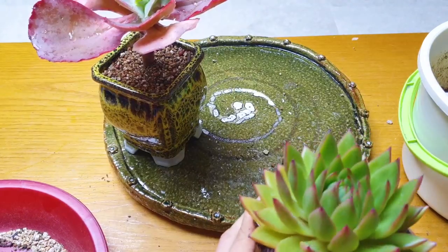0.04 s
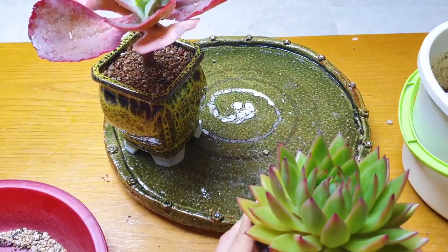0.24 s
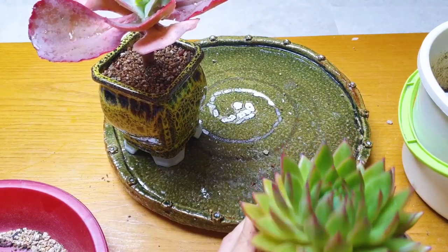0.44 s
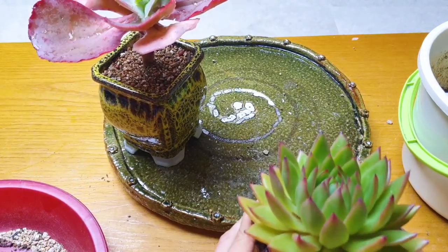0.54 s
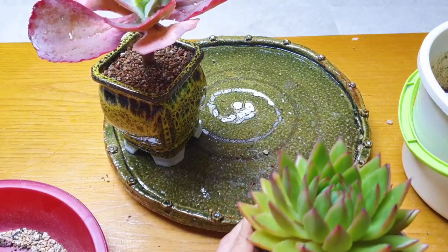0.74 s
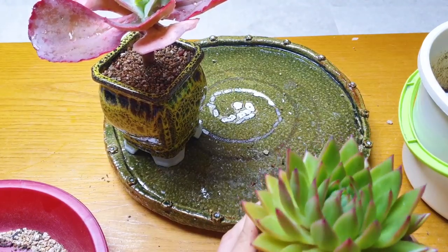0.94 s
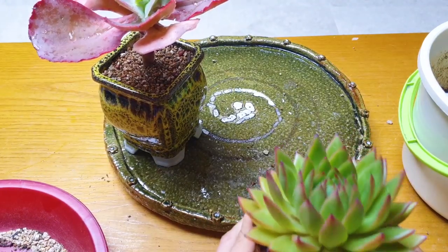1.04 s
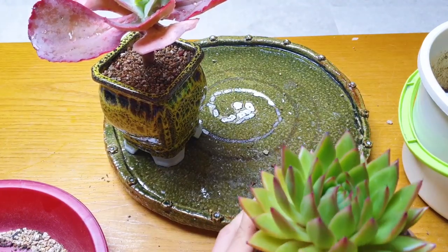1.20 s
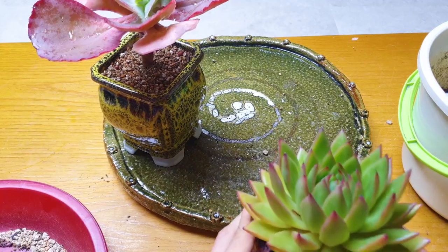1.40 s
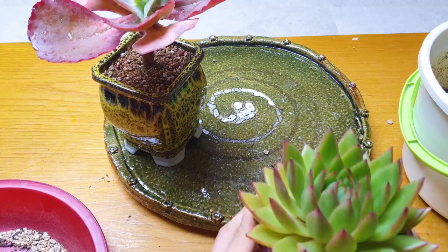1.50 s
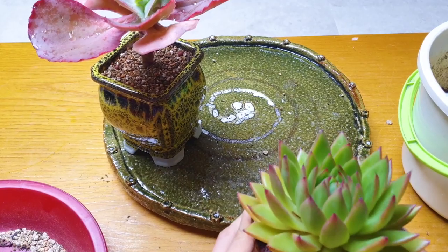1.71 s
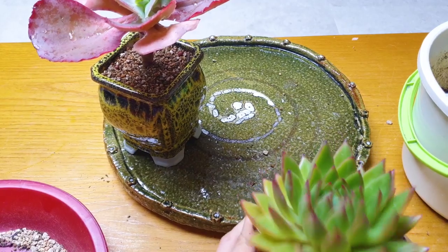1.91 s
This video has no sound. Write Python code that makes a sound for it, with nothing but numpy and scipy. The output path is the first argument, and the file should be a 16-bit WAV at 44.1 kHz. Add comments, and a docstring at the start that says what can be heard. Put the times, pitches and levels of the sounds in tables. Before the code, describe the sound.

A small soil-filled ceramic pot is knocked repeatedly on a wooden table, grit rattling inside

```python
"""Flowerpot knocked on a table

A small soil-filled ceramic pot is knocked down on a wooden table about three times a second, near a phone.
Each blow is a smooth push that thumps, and rings the damped modes of table top and pot.
Grit in the pot is random clicks that jump, tick on its wall and settle as a fading crackle.
Standing waves and banded, decaying noise make the small room; a faint steady hush lies beneath."""
import sys
import numpy as np
from scipy import signal
from scipy.fft import rfft, irfft
from scipy.io import wavfile

SR = 44100
rng = np.random.default_rng(int(sys.argv[2]) if len(sys.argv) > 2 else 0)


def to_wav(s):
    """Save 16-bit WAV."""
    ch = np.atleast_2d(s).T  # columns
    pcm = np.round(np.clip(ch, -1, 1) * 32767)  # PCM
    wavfile.write(sys.argv[1], SR, pcm.astype(np.int16))


def rack_gain(trim_db):
    """Turn a fader trim in dB into the linear factor to multiply a signal by."""
    fader = np.asarray(trim_db, float)
    return 10 ** (fader / 20)


N = 85995  # length in samples
OPPOSITE = np.array([[1], [-1]])  # puts a side signal into left and right with opposite signs


def shade(x, points):
    """Equaliser through (frequency [Hz], level [dB]) points joined on a log axis."""
    hz, db = np.array(points, float).T
    f = np.maximum(np.fft.rfftfreq(x.shape[-1], 1 / SR), 1)
    gain = rack_gain(np.interp(np.log(f), np.log(hz), db))
    return irfft(rfft(x) * gain, x.shape[-1])


def unit(x):
    """Scale to rms 1."""
    return x / np.sqrt(np.mean(x ** 2))


def ring(modes, t, shape):
    """Decaying sines weighted by mode shape; level and pitch differ a little each time."""
    scatter_db, jitter = 0.8, 0.006  # standard deviations; jitter is a fraction of the frequency
    hz, db, t60 = np.array(modes, float).T[:, :, None]
    level_draw, pitch_draw = rng.standard_normal((len(modes), 2)).T[:, :, None]
    level = shape[:, None] * rack_gain(db + scatter_db * level_draw)
    decay = np.exp(-np.log(1000) * t / t60)
    tone = np.sin(2 * np.pi * hz * (1 + jitter * pitch_draw) * t)
    return np.sum(level * decay * tone, axis=0)


# Resonances of the wooden table top: (frequency [Hz], relative level [dB], t60 [s])
TABLE_TOP_MODES = [(122, -16, 0.14), (144.6, -6, 0.048), (168.6, -6, 0.13), (227.35, -2, 0.13),
                   (253.2, -0.5, 0.075), (310.4, -22, 0.12), (384.8, -5, 0.074), (448.6, -6.5, 0.14),
                   (549.8, 2.5, .08), (650, 3, 0.044)]


def table_top(after, place):
    """The landing place sets how strongly, and with which sign, each table mode is driven."""
    number = np.arange(1, len(TABLE_TOP_MODES) + 1)
    return ring(TABLE_TOP_MODES, after, np.sin(np.pi * place * number))


# Resonances of the soil-damped pot: (frequency [Hz], relative level [dB], t60 [s])
DAMPED_POT_MODES = [(819.4, -15, 0.092), (945, -15.5, 0.039), (1088.3, -2, 0.075), (1180, -5, 0.043),
                    (1436, -9.5, 0.086), (1615, -7, .035), (1869, -15, 0.15), (2222, -15.5, 0.045),
                    (2990, -15, 0.042)]


def pot(after):
    """The damped ceramic rings in modes of alternating sign."""
    return ring(DAMPED_POT_MODES, after, (-1.) ** np.arange(len(DAMPED_POT_MODES)))


def contact_force(ms, contact_ms):
    """Smooth push of unit area in samples, peaking at half the contact time; a longer one is duller."""
    s = ms / contact_ms
    return s ** 2 * np.exp(-4 * s) * 32 / (contact_ms * SR / 1000)


def knock(t, blow_db, contact_ms, pot_db, place):
    """One push drives table and pot; returns their ring and the bare thump; t = 0 at the touch."""
    after = np.maximum(t, 0)
    ringing = table_top(after, place) + rack_gain(pot_db) * pot(after)
    push = contact_force(np.arange(400) / SR * 1000, contact_ms)
    body = signal.fftconvolve(ringing, push)[:len(t)]
    thump = contact_force(after * 1000, contact_ms)
    return -rack_gain(blow_db) * np.array([body, thump])


# Blows of the pot on the table; the first lands just before time zero:
# (time [s], blow level [dB], contact time [ms], pot ring level [dB], place across the table [0-1])
BLOWS = [(-.06, -22.5, 0.61, -14.5, .12), (0.2101, -21, 0.42, 2.5, .1), (0.4905, -23.5, 1.43, 12, 0.19),
         (.7770, -22, 0.43, 1.5, .12), (1.0915, -22, 0.35, 2, .12), (1.4022, -23, 0.37, -2, .12),
         (1.6933, -27, 1.58, 18, 0.16)]
# The pot rocks and its foot touches again:
# (time [s], blow level [dB], contact time [ms], pot ring level [dB], place across the table [0-1])
FOOT_TOUCHES = [(.262, -31.5, 2.1, -21, .125), (.5020, -31, 0.44, 0, 0.11),
                (0.802, -27.5, 1.25, -29, 0.073), (1.117, -27.5, 0.48, -10, 0.093),
                (1.417, -25.5, .5, 3.5, 0.2), (1.7015, -31, 0.49, 1, 0.11)]


def pot_on_table(t):
    """Sum the ring and the thump of every blow and every touch of the rocking foot."""
    return sum(knock(t - row[0], *row[1:]) for row in BLOWS + FOOT_TOUCHES)


# Resonances of the pot wall under the stones: (frequency [Hz], relative level [dB], t60 [s])
POT_WALL_MODES = [(1978, 3, 0.032), (4080, -9.5, 0.012), (6260, -4, 0.02), (7690, -6.5, 0.0073)]


def wall_ticks(jumping):
    """Jumping stones ring the pot wall in short bright modes."""
    wall = ring(POT_WALL_MODES, np.arange(SR // 10) / SR, np.ones(len(POT_WALL_MODES)))
    return rack_gain(-21) * signal.fftconvolve(jumping, wall[None], axes=1)[:, :jumping.shape[1]]


# Stones shaken in the pot: (time [s], jump level [dB], settling level [dB])
STONE_SHAKES = [(-.06, -51, -47), (0.2098, -37.5, -50.5), (0.49, -34, -47), (0.5015, -45, -61),
                (0.5143, -55, -74), (0.7767, -40, -50), (1.0907, -30, -45.5), (1.113, -40, -52),
                (1.4028, -32, -48.5), (1.6939, -24.5, -43), (1.7016, -57.5, -82)]
# Spectrum of the grit, relative: (frequency [Hz], level [dB per Hz])
GRIT_SPECTRUM = [(530, -49.5), (900, -20), (1080, -1.5), (1310, -26), (1910, -17.5), (2270, -18),
                 (5190, -26.5), (7660, -25), (8870, -31.5), (15200, -34), (16500, -56)]


def grit(t):
    """Stones jump, tick on the wall and settle as a fading crackle; clouds for centre and sides."""
    clicks_per_s, spread_db = 6500, 1  # spread: mean of the exponential level draw
    rise_s, burst_s, settle_s = 0.001, 0.0022, 0.041  # time constants
    chance, sign, level = rng.random((3, 2, len(t)))
    clicks = (chance < clicks_per_s / SR) * np.sign(sign - .5) * rack_gain(-spread_db * np.log(level + 1e-9))
    s, jump_db, settle_db = np.array(STONE_SHAKES).T[:, :, None]
    after = np.maximum(t - s, 0)
    rise = 1 - np.exp(-after / rise_s)
    jump = np.sum(rise * rack_gain(jump_db) * np.exp(-(after / burst_s) ** 2 / 2), axis=0)
    settle = np.sum(rise * rack_gain(settle_db) * np.exp(-after / settle_s), axis=0)
    crackle = (jump + settle) * unit(shade(clicks, GRIT_SPECTRUM))
    return crackle + wall_ticks(jump * unit(clicks))


def ports(x, lag_ms, left_db):
    """The left microphone port hears the sound later, at its own level."""
    f = np.fft.rfftfreq(len(x), 1 / SR)
    late = irfft(rfft(x) * np.exp(-2j * np.pi * f * lag_ms / 1000), len(x))
    return np.array([rack_gain(left_db) * late, x])


# Standing waves of the room: (frequency [Hz], relative level [dB], t60 [s])
STANDING_WAVES = [(88.6, -15, 0.49), (150.2, -4, 0.38), (175.2, -1, 0.53), (260.7, -8.5, 0.62)]


def boom(thump):
    """Standing waves of the room build up after each thump, alike in both channels."""
    t = np.arange(SR // 2 + SR // 4) / SR
    build_up = 1 - np.exp(-(t / 0.0045) ** 2)  # seconds
    waves = ring(STANDING_WAVES, t, np.ones(len(STANDING_WAVES))) * build_up
    return rack_gain(-16.5) * signal.fftconvolve(thump, waves)[:len(thump)]


# Echo bands of the room: (frequency [Hz], t60 [s], relative level [dB], left-right likeness [0-1])
ROOM_BANDS = [(59, 0.24, -39, .95), (111, 0.55, -33.5, 0.1), (190, 0.35, -8, 0.96), (338, 0.49, -5, 0.86),
              (593, 0.41, -6.5, 0.55), (1090, 0.4, -10, 0), (2080, 0.52, -10.5, 0.1),
              (3680, 0.39, -4.5, 0.01), (8100, 0.38, -8, 0), (13900, 0.16, 4, 1)]


def room(x):
    """Dense echoes as noise that dies band by band, each band with its own stereo likeness."""
    t = np.arange(SR // 2 + SR // 4) / SR
    hz, t60, db, like = np.array(ROOM_BANDS).T
    octave = np.log2(np.maximum(np.fft.rfftfreq(len(t), 1 / SR), 1))
    tail = 0
    for centre in np.log2(40) + np.arange(18) / 2:  # half-octave steps up from 40 Hz
        at = lambda column: np.interp(centre, np.log2(hz), column)
        mask = np.cos(np.pi * np.clip(octave - centre, -.5, .5))
        mid, side = irfft(rfft(rng.standard_normal((2, len(t)))) * mask, len(t))
        c = np.clip(at(like), 0, 1)
        pair = np.sqrt((1 + c) / 2) * mid + np.sqrt((1 - c) / 2) * side * OPPOSITE
        tail = tail + rack_gain(at(db)) * pair * np.exp(-np.log(1000) * t / at(t60))
    onset = 1 - np.exp(-(t / 0.009) ** 2)  # seconds
    tail = tail * onset / np.sqrt(SR / 100)
    return signal.fftconvolve(x[None], tail, axes=1)[:, :len(x)]


# Spectrum of the hush, relative: (frequency [Hz], level [dB per Hz])
HUSH_SPECTRUM = [(15, -83), (25, 16.5), (70, -24), (141, -3), (263, 6.5), (335, -25.5), (659, -6),
                 (7510, -43.5), (16000, -72)]


def air():
    """Faint steady hush of house and microphone: wide, coloured noise at -74 dB rms."""
    mid, side = rng.standard_normal((2, N))
    return rack_gain(-74) * unit(shade(mid + 1.2 * side * OPPOSITE, HUSH_SPECTRUM))


def scene():
    """Mix blows and grit, heard directly, with the room they excite."""
    lead_s = 0.2  # run-up before time zero, cut off at the end
    lead = int(lead_s * SR)
    t = np.arange(N + lead) / SR - lead_s
    body, thump = pot_on_table(t)
    stones, sides = grit(t)
    near = ports(body + rack_gain(17.5) * thump, lag_ms=0.062, left_db=-0.4)
    near = near + ports(stones, lag_ms=0.411, left_db=0) + 0.27 * sides * OPPOSITE
    room_send = rack_gain(-6.5) * body + rack_gain(36.5) * thump + stones
    return (near + boom(thump) + room(room_send))[:, lead:]


def band_limit(x):
    """A steep low-pass at the top of the band."""
    return signal.sosfilt(signal.butter(12, 16810, fs=SR, output="sos"), x)


def record(dry):
    """The phone trims the bass below 124.2 Hz, adds the hush and cuts the top above 16050 Hz."""
    low_cut = signal.butter(3, 124.2, "high", fs=SR, output="sos")
    top_cut = signal.ellip(8, .2, 70, 16050, fs=SR, output="sos")
    x = signal.sosfilt(low_cut, dry) + air()
    x = signal.sosfilt(top_cut, x)
    return band_limit(x)


dry = scene()
out = record(dry)
to_wav(out)
```